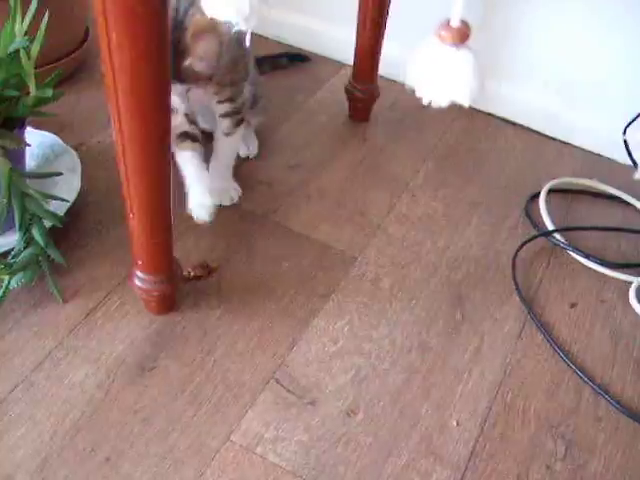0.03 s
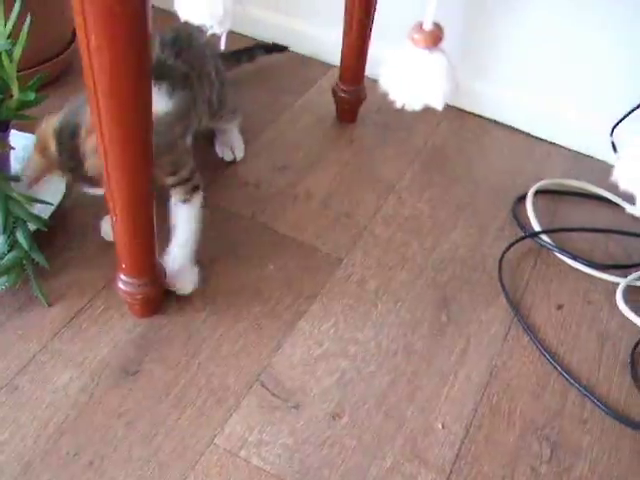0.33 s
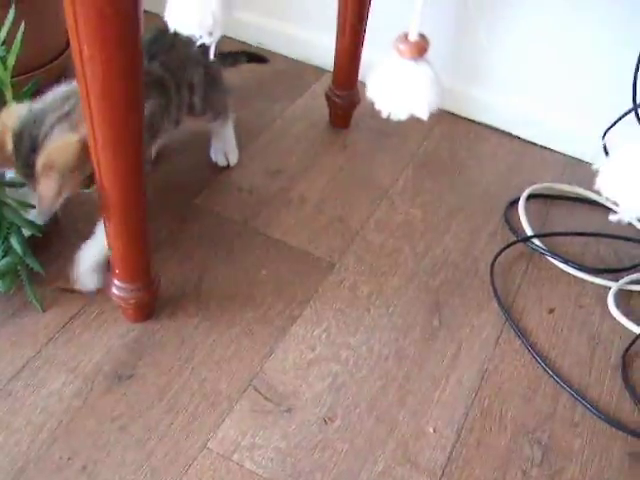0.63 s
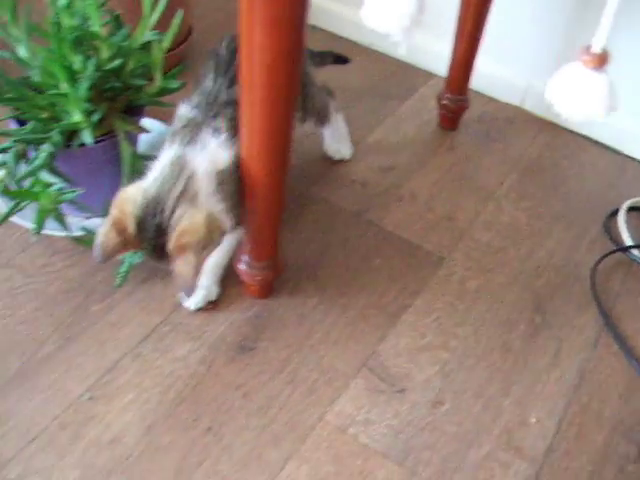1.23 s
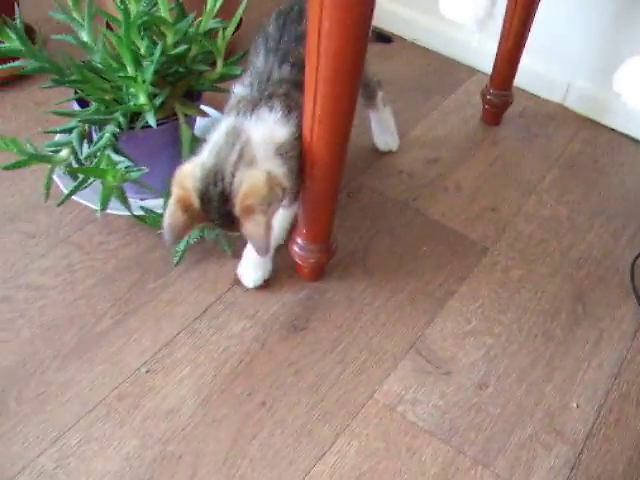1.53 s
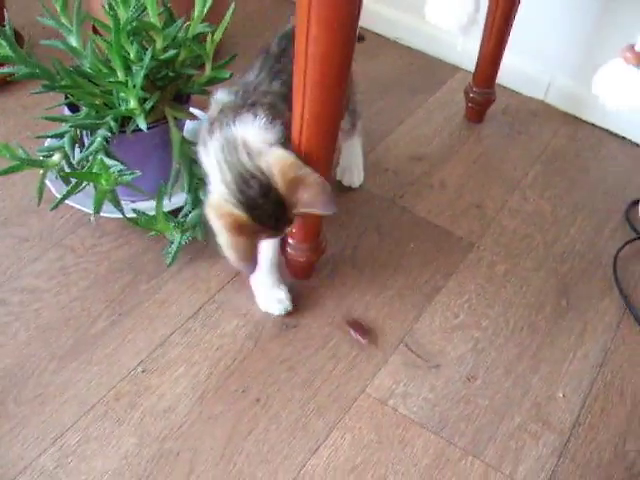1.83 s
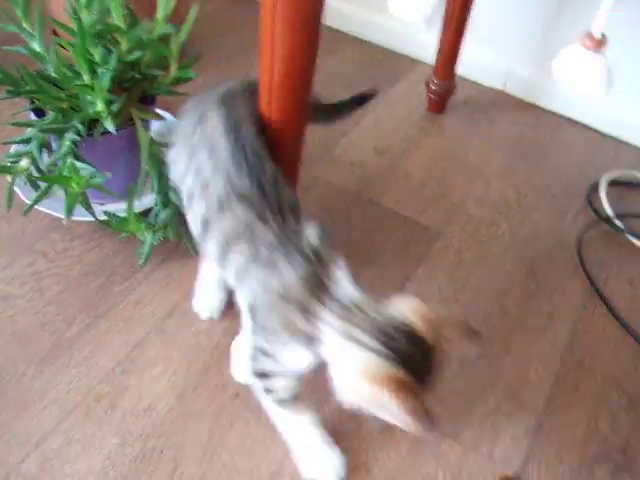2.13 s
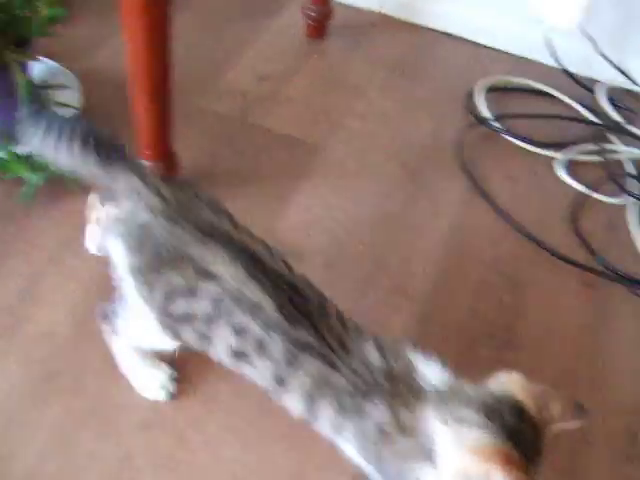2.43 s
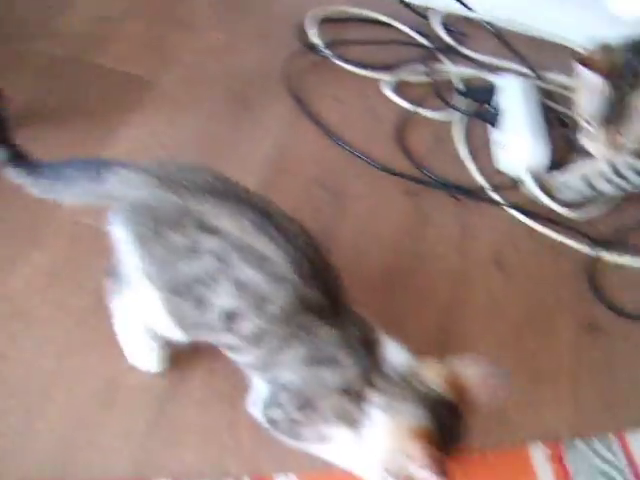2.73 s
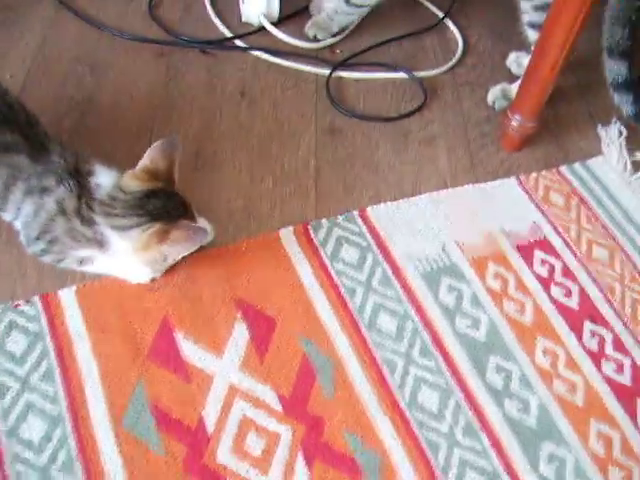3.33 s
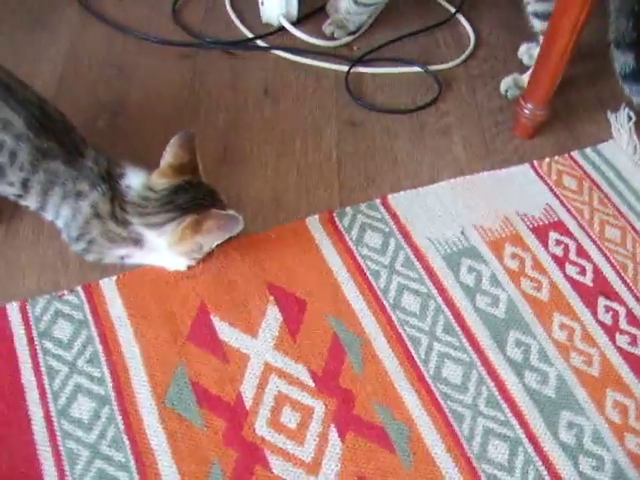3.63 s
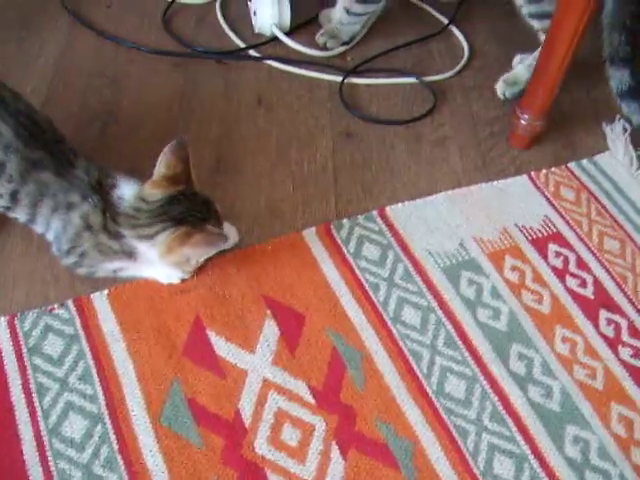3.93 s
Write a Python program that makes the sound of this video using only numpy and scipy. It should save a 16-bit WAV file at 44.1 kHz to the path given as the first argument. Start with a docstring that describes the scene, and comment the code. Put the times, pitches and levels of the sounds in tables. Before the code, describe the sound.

A kitten growls, low and rough, close to the microphone in a quiet room. First its claws tick and scrape lightly on a wooden floor, then come three dry crunches, and the growl starts, joined by a breathy hiss.

```python
"""Kitten with its prey

A quiet room with a wooden floor, a small microphone close by. A kitten paws at a small prey, snatches
it with three dry crunches, then guards it with a low, rough growl and a breathy hiss. The growl is a
train of throat pulses that a second, slower vibration, the flutter, pushes early and late.
Underneath lie a steady background hiss, a low hum and a thin electronic whine."""
import sys
import numpy as np
from scipy import signal
from scipy.fft import rfft, irfft
from scipy.io import wavfile

SR = 44100
rng = np.random.default_rng(int(sys.argv[2]) if len(sys.argv) > 2 else 0)


def output_pcm(signal):
    """Save a mono or channel-first signal as 16-bit PCM at the path in sys.argv[1].

    Samples are clipped to [-1, 1] before scaling.
    """
    pcm = np.clip(np.atleast_2d(signal).T, -1, 1) * 32767
    wavfile.write(sys.argv[1], SR, np.round(pcm).astype(np.int16))


N = 176400
T = np.arange(N) / SR

# Pace of the throat pulses: (time [s], rate [Hz])
PULSE_RATE = [(2.66, 128.3), (2.696, 137.3), (2.76, 140.5), (2.862, 128.5), (3.03, 140.9), (3.082, 139.7),
              (3.226, 147.5), (3.3, 154.7), (3.378, 155.5), (3.526, 151.3), (3.712, 151.1), (3.744, 148.2),
              (3.814, 152.2), (3.99, 144.6)]
# Drive of each resonance, before its gain:
# (time [s], chest [dB], lower throat [dB], upper throat [dB], mouth [dB])
GROWL_EFFORT = [(2.665, -40, -41.5, -41, -58.0), (2.72, -42.5, -40.5, -45, -49.5),
                (2.79, -36, -40, -79, -42), (2.86, -44.5, -44.5, -70, -67), (2.95, -39.5, -47, -42.5, -56),
                (3.05, -40, -48.5, -45.5, -55.5), (3.13, -39.5, -45, -54, -68), (3.2, -42, -50, -43, -46.5),
                (3.31, -38, -40, -41, -36.5), (3.42, -40.5, -46, -36.5, -46), (3.5, -39.5, -45, -39.5, -49),
                (3.65, -38, -47.5, -41, -54), (3.85, -40.5, -53, -39, -52), (3.98, -40, -47.5, -40.5, -57)]
# The four resonances, chest to mouth: (centre [Hz], width [Hz], gain [dB], muffled above [Hz])
GROWL_RESONANCES = [(270, 213, -7, 504), (642, 173, -2, 805), (839, 97, -5, 790), (1278, 177, -8, 4300)]
def growl():
    """Throat pulses, by turns early and late, ring chest, throat and mouth; a wet rattle builds on them."""
    start_s, attack_s = 2.651, .012
    relaxed_hz, strained_hz = 105, 151.4
    flutter_per_pulse, wander_rad = .54, .22
    shift_periods, jitter_periods, shimmer_db = .068, .02, 1.1
    flutter_depth, breathiness = .16, .24
    rattle_hz, rattle_width_hz, rattle_start_s, rattle_rise_s = 3210, 450, 2.58, .8
    rate_hz, = in_time(PULSE_RATE)
    cycles = np.cumsum(rate_hz) / SR
    phase = 2 * np.pi * cycles
    pulse = np.arange(1, int(cycles[-1]) + 1)
    jitter, shimmer, wetness, wander = rng.standard_normal((len(pulse), 4)).T
    flutter = 2 * np.pi * flutter_per_pulse * pulse + wander_rad * np.cumsum(wander)
    # The flutter deepens as the pulse rate rises.
    strain = np.clip((rate_hz - relaxed_hz) / (strained_hz - relaxed_hz), 0, 1)
    pulse_strain = np.interp(pulse, cycles, strain)
    lateness = pulse_strain * shift_periods * np.sin(flutter) + jitter_periods * jitter
    times = np.interp(pulse + lateness, cycles, T)
    sizes = (1 - pulse_strain * flutter_depth * np.cos(flutter)) * from_db(shimmer_db * shimmer)
    air = rms_one(noise() * (1 + np.cos(phase)))
    # Strain brings out the flutter's own tone, between the first two harmonics, and a clean third.
    flutter_tone = strain ** 2 * from_db(-24) * np.cos(phase + np.interp(cycles, pulse, flutter))
    third_harmonic = -strain ** 10 * from_db(-18) * np.cos(3 * phase)
    source = flutter_tone + third_harmonic + breathiness * air - rms_one(clicks(times, sizes))
    source = cut_both_ways(source, 160, "high")
    out = 0
    for effort_db, (hz, width_hz, gain_db, top_hz) in zip(in_time(GROWL_EFFORT), GROWL_RESONANCES):
        ring = cut_both_ways(resonate(source, hz, width_hz), top_hz, "low", order=3)
        out += from_db(effort_db + gain_db) * rms_one(ring)
    wet_air = air * from_db(3.5 * np.interp(T, times, np.clip(wetness, -2, 2)))
    rattle = resonate(wet_air, rattle_hz, rattle_width_hz)
    rattle = rms_one(resonate(rattle, rattle_hz, 2 * rattle_width_hz))
    out += from_db(-56.5) * rattle * ramp(rattle_start_s, rattle_rise_s)
    return out * ramp(start_s, attack_s)


# Force of the kitten's hiss: (time [s], level [dB])
HISS_LEVEL = [(3.14, -66), (3.19, -41), (3.225, -40.5), (3.3, -48), (3.48, -51), (3.56, -46), (3.62, -47.5),
              (3.66, -63), (3.685, -59), (3.705, -43.5), (3.735, -49.5), (3.77, -72), (4.0, -70)]
# Its tone at the microphone: (frequency [Hz], gain [dB])
HISS_SPECTRUM = [(500, -7), (1200, -1.5), (2000, -7), (3000, -1), (4200, -3), (5500, -4), (7000, -3.5),
                 (8500, -20.5)]
def hiss():
    """Air rushes past the teeth as the growl swells."""
    level_db, = in_time(HISS_LEVEL)
    breath = colour(grainy(spread_db=1.5, rate_hz=270), HISS_SPECTRUM)
    return from_db(level_db) * (T > HISS_LEVEL[0][0]) * rms_one(band_limit(breath))


# Snaps of the prey between the teeth, in three bites: (time [s], relative level [dB], ring [Hz])
BITE_SNAPS = [(2.3566, -19, 2310), (2.3586, -34, 3340), (2.3621, -23, 3000), (2.3653, -15.5, 3200),
              (2.3725, -16, 3420), (2.3727, -13.5, 2160), (2.3775, -22.5, 2590), (2.503, -21.5, 6000),
              (2.5066, -19, 3120), (2.5083, -18, 3800), (2.5113, -21.5, 4000), (2.5991, -13.5, 7160),
              (2.5989, -20.5, 1940), (2.6034, -20.5, 4080), (2.606, -18.5, 1530), (2.6056, -16.5, 2160)]
# Their tone at the microphone: (frequency [Hz], gain [dB])
BITE_SPECTRUM = [(300, -8), (800, 1), (1400, -1.5), (2100, 2), (4000, 2), (5800, -0.5), (7800, -5),
                 (9000, -23)]
def crunches():
    """Each snap is a sharp crack with a short ring, followed by a spray of splinters."""
    crack_gain_db, ring_gain_db, spray_decay_s = 11.5, 14, .0039
    splinters = from_db(-9) * grainy(spread_db=3, rate_hz=1500)
    out = 0
    for start_s, level_db, ring_hz in BITE_SNAPS:
        crack = clicks([start_s], [from_db(crack_gain_db)])
        ring = from_db(ring_gain_db) * resonate(crack, ring_hz, width_hz=185)
        spray = splinters * decay(start_s, spray_decay_s)
        out += from_db(level_db) * cut(crack + ring + spray, .66 * ring_hz, "high")
    return colour(out, BITE_SPECTRUM)


# Light taps on the floorboards: (time [s], level [dB], centre [Hz])
PAW_TAPS = [(.694, -48.5, 3220), (0.729, -46, 5000), (0.94, -45.5, 3500), (1.112, -39.5, 3430),
            (1.276, -46.5, 4500), (1.691, -46.5, 3430), (1.707, -44, 3470), (1.74, -45, 3400),
            (1.761, -48, 3300), (1.869, -46.5, 3620), (1.921, -40, 2370), (1.964, -41.5, 3930),
            (2.186, -38.5, 5500), (2.238, -40, 2200), (2.318, -44, 2400), (2.337, -44, 4560),
            (3.2217, -37, 4470)]
# Paws and claws sliding on the wood: (middle time [s], length [s], level [dB], centre [Hz])
PAW_SLIDES = [(0.38, 0.047, -49, 4200), (0.792, 0.1, -57, 4500), (1.02, 0.055, -54, 4000),
              (1.117, 0.048, -48.5, 3730), (1.817, 0.035, -50, 3560), (1.988, 0.014, -48.5, 3900),
              (2.067, 0.11, -50, 3700), (2.192, 0.044, -51, 5000), (2.269, 0.051, -48.5, 2860),
              (2.409, 0.0073, -38, 3500), (2.46, 0.049, -51, 3330), (2.635, 0.062, -48, 2750),
              (2.77, 0.026, -50, 4450)]
def paws():
    """Claws tick on the boards with a soft thud and scrape across them in gritty slides."""
    contact, grit = noise(), grainy(spread_db=2, rate_hz=110)
    thud = from_db(-31.5) * rms_one(resonate(noise(), 600, width_hz=700))
    out = 0
    for start_s, level_db, hz in PAW_TAPS:
        tick = rms_one(resonate(contact, hz, width_hz=.41 * hz))
        out += from_db(level_db) * decay(start_s, decay_s=.0068) * (tick + thud)
    for middle_s, length_s, level_db, hz in PAW_SLIDES:
        fine_grit = cut(grit, .25 * hz, "high", order=4)
        scrape = rms_one(resonate(fine_grit, hz, width_hz=.5 * hz))
        out += from_db(level_db) * swell(middle_s, length_s) * scrape
    return out


def squeak():
    """One faint, pure squeak among the paw taps."""
    pitch_hz = 2626
    return from_db(-53) * swell(middle_s=.902, length_s=.094) * np.sin(2 * np.pi * pitch_hz * T)


def room(x):
    """The furnished room's short, diffuse tail reaches the microphone just after the direct sound."""
    t60_s, gap_s = .34, .006
    t = T[:SR // 2]
    tail = rng.standard_normal(len(t)) * from_db(-60 * t / t60_s) * (t > gap_s)
    return signal.fftconvolve(x, tail / np.linalg.norm(tail))[:N]


# Steady background hiss: (frequency [Hz], relative density [dB])
FLOOR_SPECTRUM = [(10, -10), (25, -1), (45, -4), (100, -8), (150, -6), (300, -7.5), (700, -10), (1950, -13),
                  (3500, -13), (7400, -12.5), (8400, -20.5)]
# Low hum: (time [s], level [dB])
HUM_LEVEL = [(0, -59), (1.9, -61), (2.15, -60), (4.0, -69)]
# Electronic whine, two close pairs of tones: (frequency [Hz], level [dB])
WHINE_TONES = [(7678, -70.5), (7707, -64), (8293, -96.5), (8322, -89.5)]
def background():
    """A steady hiss, as of coarse quantization, with a wavering hum and a thin, beating whine."""
    hum_hz, hum_width_hz = 76, 16
    floor = from_db(-52.5) * rms_one(band_limit(colour(noise(), FLOOR_SPECTRUM)))
    hum_db, = in_time(HUM_LEVEL)
    hum = resonate(noise(), hum_hz, hum_width_hz)
    hum = from_db(hum_db) * rms_one(resonate(hum, hum_hz, hum_width_hz))
    whine = sum(from_db(db) * np.sqrt(2) * np.sin(2 * np.pi * hz * T) for hz, db in WHINE_TONES)
    return floor + hum + whine


def from_db(db):
    """Decibels to gain."""
    return 10 ** (np.asarray(db) / 20)


def rms_one(x):
    """Scale to unit rms."""
    return x / np.sqrt(np.mean(x ** 2) + 1e-20)


def in_time(rows):
    """Each column of a timed curve at every sample."""
    times, *columns = np.transpose(rows)
    return [np.interp(T, times, column) for column in columns]


def cut(x, hz, kind, order=2):
    """Low- or high-pass."""
    return signal.sosfilt(signal.butter(order, hz, kind, fs=SR, output="sos"), x + 1e-18)


def cut_both_ways(x, hz, kind, order=2):
    """Low- or high-pass, forward then backward, which keeps a pulse compact."""
    return cut(cut(x, hz, kind, order)[::-1], hz, kind, order)[::-1]


def band_limit(x, top_hz=8550):
    """Steep low-pass at the top of the recorder's range."""
    return signal.sosfilt(signal.ellip(10, .1, 70, top_hz, fs=SR, output="sos"), x)


def resonate(x, hz, width_hz):
    """One resonance, gain 1 at its peak."""
    r = np.exp(-np.pi * width_hz / SR)
    feedback = [1, -2 * r * np.cos(2 * np.pi * hz / SR), r * r]
    return signal.lfilter(np.array([1, 0, -1]) * (1 - r * r) / 2, feedback, x + 1e-18)


def colour(x, points):
    """Causal (minimum-phase) filter through (frequency [Hz], gain [dB]) points."""
    size = 2 * N
    hz, db = np.transpose(points)
    gain_db = np.interp(np.log(np.fft.rfftfreq(size, 1 / SR) + 1), np.log(hz), db)
    cepstrum = irfft(np.log(from_db(gain_db)))
    cepstrum[1:N] *= 2
    cepstrum[N + 1:] = 0
    return irfft(rfft(x, size) * np.exp(rfft(cepstrum)))[:N]


def noise():
    """White noise."""
    return rng.standard_normal(N)


def grainy(spread_db, rate_hz):
    """Noise whose strength jumps about quickly."""
    carrier = noise()
    flicker = np.clip(rms_one(cut(noise(), rate_hz, "low")), -2, 2)
    return rms_one(carrier * from_db(spread_db * flicker))


def clicks(times, sizes):
    """Single-sample impulses."""
    return np.bincount(np.round(np.asarray(times) * SR).astype(int), sizes, N)[:N]


def swell(middle_s, length_s):
    """A smooth rise and fall."""
    return np.exp(-2 * ((T - middle_s) / length_s) ** 2)


def ramp(start_s, rise_s):
    """A straight rise from 0 to 1, then held."""
    return np.clip((T - start_s) / rise_s, 0, 1)


def decay(start_s, decay_s):
    """A sudden onset that dies away exponentially."""
    return (T >= start_s) * np.exp(-np.minimum(np.abs(T - start_s) / decay_s, 20))


def scene():
    """The kitten close to one microphone, the room well behind it, the noise floor underneath."""
    kitten = paws() + squeak() + crunches() + growl() + hiss()
    return (kitten + from_db(-14) * room(kitten) + background())[None]


def record(dry):
    """The recorder cuts off the high treble."""
    return band_limit(dry)


dry = scene()
out = record(dry)
output_pcm(out)
```